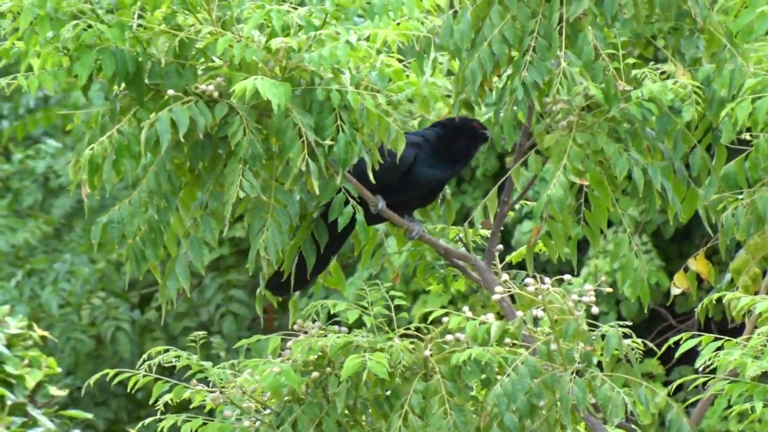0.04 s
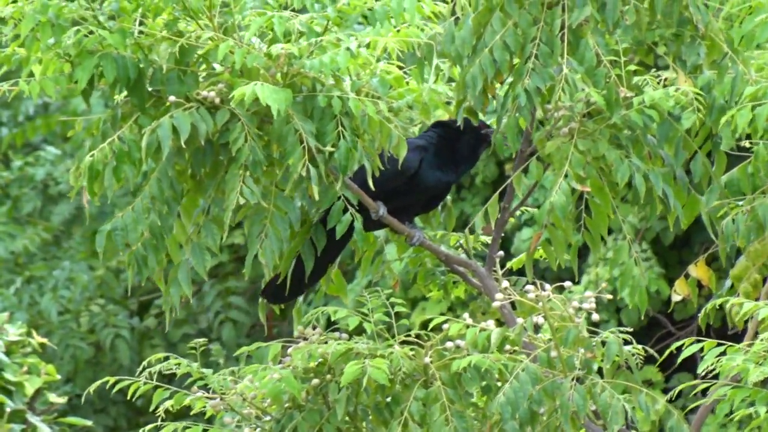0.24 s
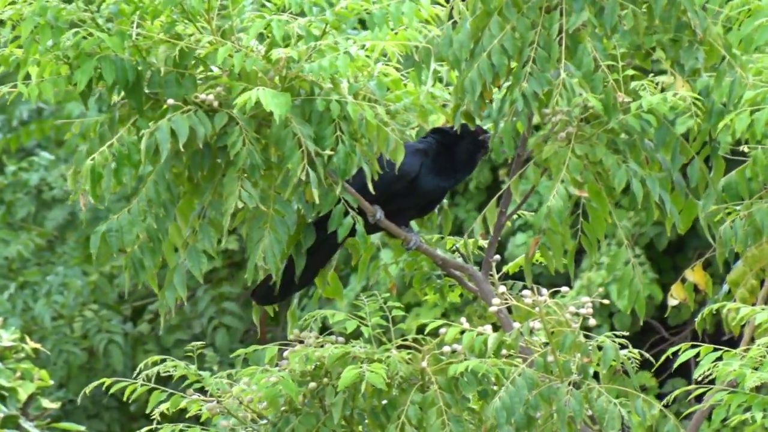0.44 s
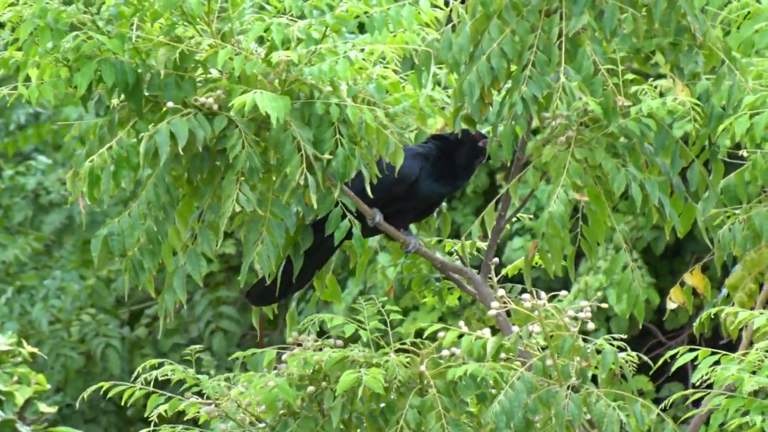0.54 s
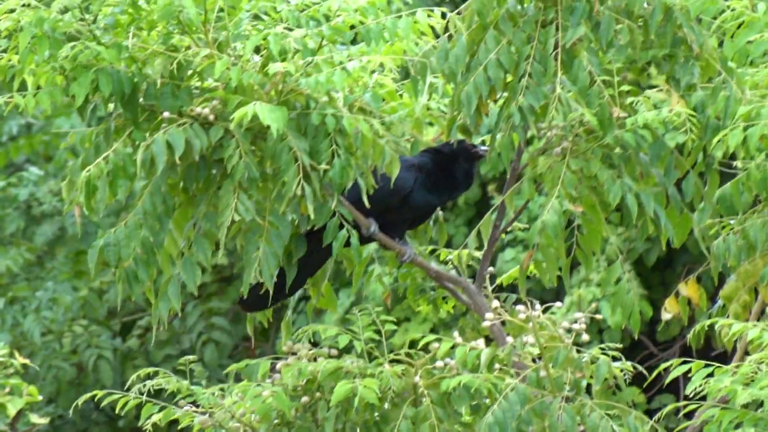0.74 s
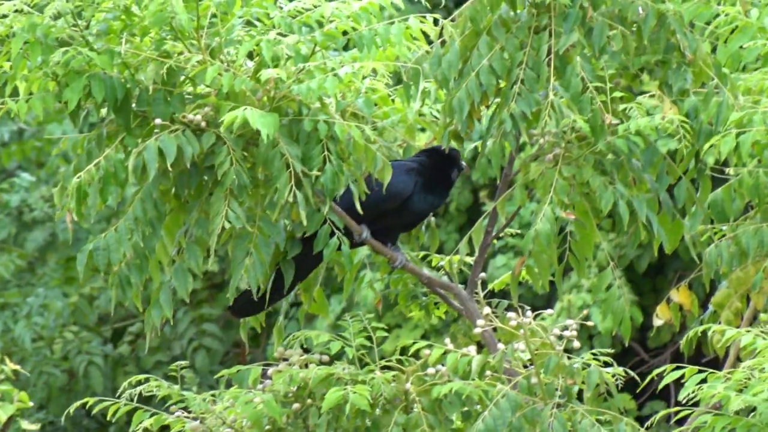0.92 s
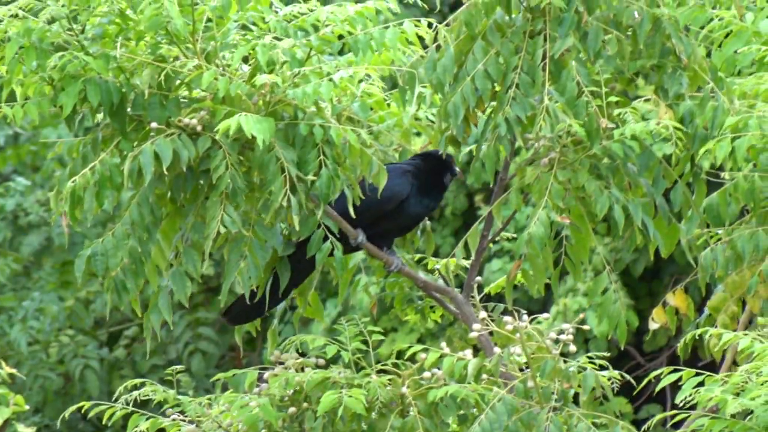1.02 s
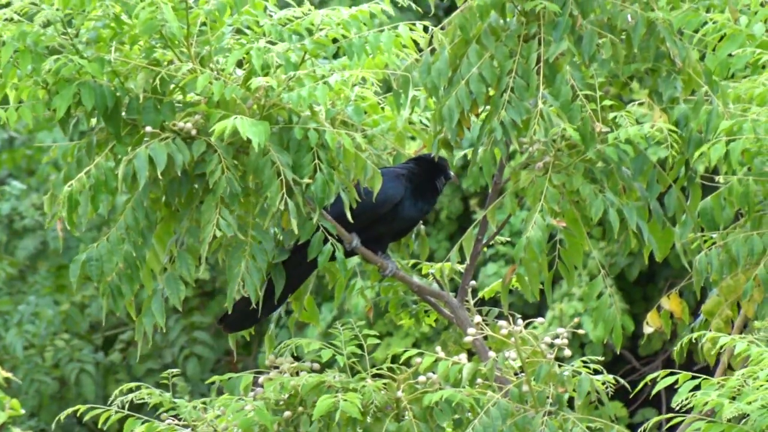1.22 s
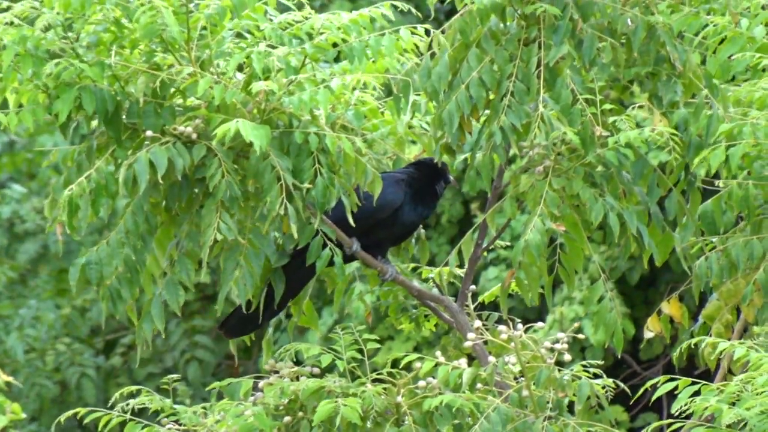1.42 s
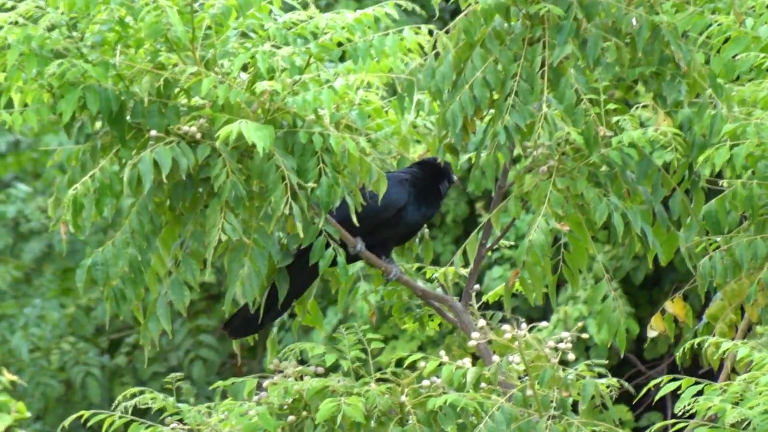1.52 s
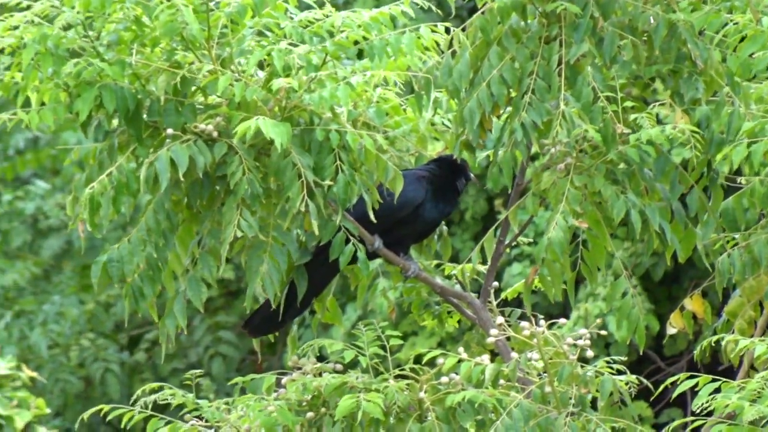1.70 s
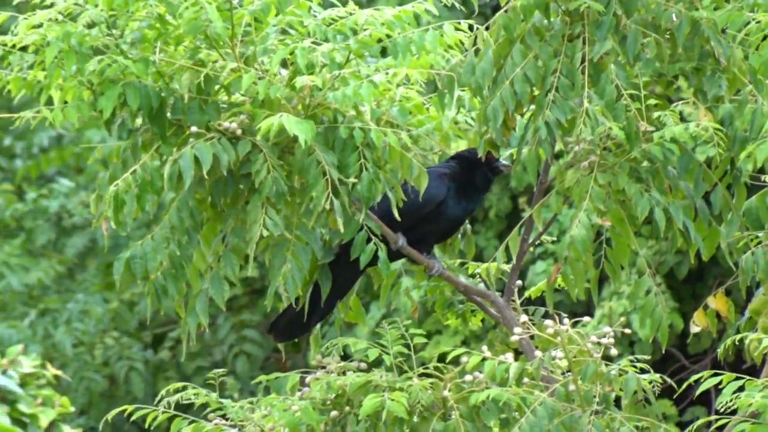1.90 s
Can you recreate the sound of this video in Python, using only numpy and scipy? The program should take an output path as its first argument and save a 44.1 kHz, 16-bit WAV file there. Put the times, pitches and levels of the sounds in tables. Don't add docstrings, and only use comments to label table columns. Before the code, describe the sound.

A large dark bird whistles one clear echoing note that rises then falls in a leafy garden

```python
import sys
import numpy as np
from scipy import signal
from scipy.fft import rfft, irfft
from scipy.io import wavfile
from scipy.ndimage import uniform_filter1d, map_coordinates

SR = 44100
rng = np.random.default_rng(int(sys.argv[2]) if len(sys.argv) > 2 else 0)


def unload_wav(signal):
    wavfile.write(
        sys.argv[1],
        SR,
        np.round(np.clip(np.atleast_2d(signal).T, -1, 1) * 32767).astype(np.int16),
    )


def volts_from_db(level):
    exponent = np.asarray(level, float) / 20
    return 10 ** exponent


N = 85995

# time in seconds, pitch in Hz, level in dB.
CALL_NOTE = [
    (0.307, 1364.0, -23.1),
    (0.354, 1358.6, -27.0),
    (0.478, 1354.2, -18.8),
    (0.544, 1399.8, -15.9),
    (0.595, 1465.7, -25.0),
    (0.645, 1546.6, -17.3),
    (0.697, 1558.3, -17.4),
    (0.743, 1496.8, -20.7),
    (0.856, 1015.6, -35),
]
# multiple of the pitch, level in dB against the main tone.
CALL_OVERTONES = [(2, -32), (3, -40), (4, -41), (5, -33), (6, -48), (7, -48), (8, -50), (9, -43), (11, -42)]
# time in seconds, pitch in Hz, level in dB.
RISING_NOTE = [(.33, 4240, -45), (.36, 4370, -42), (.4, 4610, -32), (.44, 4855, -35.5), (.48, 4975, -32.5),
               (.52, 5050, -35), (.59, 5073, -30.5), (.61, 5070, -35), (.63, 5040, -48)]
SWOOPING_NOTE = [(.195, 3250, -24), (.205, 2960, -26.5), (.222, 2493, -36), (.238, 2379, -22),
                 (.25, 2214, -32), (.265, 2212, -18), (.295, 2110, -28), (.315, 2112, -32.5),
                 (.345, 2068, -60)]
CHIP_NOTE = [(.615, 2520, -50), (.638, 2400, -38), (.65, 2340, -23), (.66, 2300, -31), (.67, 2180, -36),
             (.69, 2030, -48)]
SAGGING_NOTE = [(0, 2893, -39), (.04, 2810, -37), (.09, 2703, -32), (.135, 2617, -38), (.155, 2590, -55),
                (.2, 2610, -38), (.22, 2643, -23.5)]
# multiple of the listed pitch, level in dB against the tone at that pitch. For
RISING_PARTIALS = [(.5, -17), (1.5, -25), (2, -27), (3, -50)]
SWOOPING_OVERTONES = [(2, -28)]
# start in seconds, length in seconds, pitch in Hz, glide in Hz, level in dB.
FAR_PIPINGS = [
    (.33, .2, 2210, 350.5, -47),
    (0.414, 0.61, 3400, 147, -50.5),
    (0.66, 0.1, 3120, -52.5, -52),
    (0.675, 0.04, 1216, -18, -43),
    (1.655, 0.04, 2780, 8, -50),
    (1.775, 0.065, 3760, -0.5, -46),
    (1.87, .08, 3730, -1, -43),
    (1.8, 0.13, 4230, 17, -47),
    (1.87, .06, 2700, 240, -49),
]
# time in seconds, centre in Hz, level in dB, width in Hz.
RASP_PATH = [
    (1.03, 3100, -55, 900),
    (1.08, 3350, -37, 1100),
    (1.2, 3420, -36, 1100),
    (1.3, 3350, -33, 900),
    (1.41, 3000, -33, 800),
    (1.44, 2900, -40, 900),
    (1.47, 2800, -55, 900),
]
# time in seconds, centre in Hz, level in dB, width in Hz.
RASP_BREAK = [
    (1.405, 2500, -48, 600),
    (1.425, 2320, -37, 450),
    (1.455, 2150, -35, 400),
    (1.468, 1750, -45, 800),
    (1.49, 1600, -43, 700),
    (1.505, 1330, -43, 450),
    (1.545, 1220, -42, 350),
    (1.56, 1150, -55, 300),
]
# delay in seconds, level in dB, left over right in dB.
NEAR_ECHOES = [(0.0122, -12.9, 5.6), (0.01813, -15.6, -5.4), (0.02436, -18.6, -5.7), (0.02497, -10.5, 0.9),
               (0.03518, -10.0, -1.6), (0.04454, -13.5, 4.9), (0.04793, -4.6, -0.7), (0.05576, -19.1, 2.7),
               (0.05918, -12.7, -4.0), (0.0725, -16.3, 3.9), (0.08151, -17.0, -5.5), (0.0963, -20.2, 1.6),
               (0.11501, -17.2, -4.3), (0.12631, -18.6, -5.9)]
# delay in seconds, level in dB, left over right in dB.
FAR_ECHOES = [(.107, -16, -3), (.15, -19, -4), (.172, -15, 1), (.2, -21, 0), (.225, -24, -1),
              (.255, -24, 1.4), (.29, -25, -5), (.33, -30, -3)]
# time in seconds, level in dB.
GUST_STRENGTH = [(0.0, -73), (0.732, -58.5), (0.934, -56), (1.07, -32), (1.2, -46.5), (1.378, -39.5),
                 (1.514, -28.5), (1.58, -29), (1.688, -41), (1.824, -32.5), (1.95, -44)]
# time in seconds, peak in dB, pitch in Hz, push (1) or suction (-1).
WIND_BUFFETS = [(1.006, -27, 69, -1), (1.288, -18.5, 96, 1), (1.42, -20, 151, 1), (1.466, -22, 130, 1),
                (1.505, -21, 99, 1), (1.531, -20, 80, -1), (1.546, -19, 130, 1), (1.56, -15.5, 270, 1),
                (1.611, -19, 90, 1), (1.625, -22, 80, -1), (1.662, -12, 170, -1), (1.665, -19, 260, 1),
                (1.827, -25.5, 108, -1), (1.84, -23, 130, 1), (1.868, -20, 230, 1)]
# frequency in Hz, level in dB per Hz.
WIND_SPECTRUM = [(15, -40), (25, -21), (49, 6), (130, 2.5), (390, -9.5), (430, -39), (700, -19.5),
                 (910, -65), (1540, -120)]
AIR_SPECTRUM = [(18, -41.5), (40, -0.5), (140, -4), (532, -12.5), (2180, -18), (3400, -13), (10200, -33),
                (15500, -33)]
# frequency in Hz, likeness from 0 to 1.
AIR_LIKENESS = [(60, .995), (200, .99), (380, .96), (700, .88), (1400, .75), (3100, .42), (6800, .1),
                (15000, .15)]
# centre in Hz, width in Hz, boost in dB.
MIC_TREBLE = [
    (13000, 450, -8),
    (13850, 250, 5),
    (15100, 800, -10),
]


def whistle(rows, overtones, flutter_db, smooth_s=0.02, wobble=0.00196):
    beak_hz, beak_width_hz, beak_boost_db = 14500, 1300, 10
    hz, db, gate = in_time(rows, smooth_s)
    phase = 2 * np.pi * np.cumsum(hz * (1 + wobble * drift(30.0))) / SR
    tone = np.sin(phase) * volts_from_db(flutter_db * drift(29))
    for multiple, level_db in overtones:
        beak_db = beak_boost_db * np.exp(-((multiple * hz - beak_hz) / beak_width_hz) ** 2)
        loudness = volts_from_db(level_db + beak_db + 3.5 * drift(15))
        tone = tone + loudness * np.sin(multiple * phase)
    return np.sqrt(2) * volts_from_db(db) * gate * tone


def large_bird():
    return volts_from_db(.6) * whistle(CALL_NOTE, CALL_OVERTONES, 0, smooth_s=.0295, wobble=0)


def rasp():
    skirt_db, skirt_width, upper_db, breath_db, grain_db = -6, 2.0, -15.5, -19, -1
    hz, db, width_hz, gate = in_time(RASP_PATH)
    phase = 2 * np.pi * np.cumsum(hz) / SR
    core = blurred(phase, width_hz)
    skirt = volts_from_db(skirt_db) * blurred(1.08 * phase, skirt_width * width_hz)
    upper = volts_from_db(upper_db) * blurred(2.2 * phase, 2.6 * width_hz)
    breath_band = signal.butter(2, [5000, 13500], "band", fs=SR, output="sos")
    breath = volts_from_db(breath_db) * signal.sosfilt(breath_band, rng.standard_normal(N))
    loudness = volts_from_db(db + 3.5 + grain_db * drift(150)) * gate
    return loudness * (core + skirt + upper + breath) + rasp_break()


def rasp_break():
    hz, db, width_hz, gate = in_time(RASP_BREAK, .006)
    phase = 2 * np.pi * np.cumsum(hz) / SR
    return volts_from_db(db + 2.5) * gate * blurred(phase, width_hz)


def pipings():
    total = 0
    for start, length, hz, glide_hz, db in FAR_PIPINGS:
        swell = [(start, hz, db - 6),
                 (start + length / 3, hz + glide_hz / 3, db),
                 (start + length, hz + glide_hz, db - 5)]
        total = total + whistle(swell, [], 4.5, wobble=.008)
    return total


def garden_echoes(x):
    scatter_db, scatter_t60_s, scatter_rise_s, scatter_width, smear_s = -16.5, .9, .2, .8, .012
    t = np.arange(int(.9 * SR)) / SR
    shape = volts_from_db(-60 * t / scatter_t60_s) * np.clip(t / scatter_rise_s, 0, 1) ** 2
    mid, side = rng.standard_normal((2, len(t))) * shape
    scatter = mid + scatter_width * side * [[1], [-1]]
    late = volts_from_db(scatter_db) * scatter / np.sqrt(np.sum(mid ** 2))
    for delay, db, pan_db in FAR_ECHOES:
        burst = rng.standard_normal(len(t)) * np.exp(-((t - delay) / smear_s) ** 2)
        late = late + pan(volts_from_db(db) * burst / np.sqrt(np.sum(burst ** 2)), pan_db)
    near = 0
    for delay, db, pan_db in NEAR_ECHOES:
        near = near + pan(volts_from_db(db) * np.sinc((t - delay) * SR / 2) / 2, pan_db)
    dull = signal.sosfilt(signal.butter(2, 3500, fs=SR, output="sos"), x)
    near, late = [signal.fftconvolve(dull[None], reply, axes=1)[:, :N] for reply in (near, late)]
    leaf_sway = volts_from_db(4 * drift(35) - 2)
    return near + late * leaf_sway


def wind():
    port_lag_s, buffet_cycles, lump_db = .0011, 0.53, 3.5
    db, _ = in_time(GUST_STRENGTH)
    strength = volts_from_db(db + lump_db * drift(19))
    out = strength * banded_noise(WIND_SPECTRUM, [(30, 1.0), (250, .35)], patchy_db=1.5)
    t = np.arange(N) / SR
    for start, peak_db, hz, sign in WIND_BUFFETS:
        cycles = (t - start - port_lag_s / 2 * np.array([[1], [-1]])) * hz
        swell = np.exp(-(cycles / buffet_cycles) ** 2)
        out = out + sign * volts_from_db(peak_db) * swell * np.cos(2 * np.pi * cycles + .5)
    return out


def chorus():
    centre_hz, width_hz, level_db, patch_db = 3400, 500, -46, 2.5
    phase = 2 * np.pi * centre_hz * np.arange(N) / SR
    sides = [blurred(phase, np.full(N, width_hz)) for _ in range(2)]
    return volts_from_db(level_db + patch_db * drift(6.9)) * np.array(sides)


def town_and_leaves():
    return volts_from_db(-35) * banded_noise(AIR_SPECTRUM, AIR_LIKENESS, patchy_db=1.08)


def banded_noise(spectrum, likeness, patchy_db):
    out, edges = 0, 25 * 2 ** np.arange(0, 9.6, .5)
    white = rng.standard_normal((2, 2, N + 4000))
    for k, (low, high) in enumerate(zip(edges, edges[1:])):
        hz = np.sqrt(low * high)
        if hz > spectrum[-1][0] * 1.2:
            break
        band = signal.butter(2, [low, high], "band", fs=SR, output="sos")
        mid, side = signal.sosfilt(band, white[k % 2])[:, -N:]
        alike = np.clip(at_hz(likeness, hz), 0, 1)
        gain = volts_from_db(at_hz(spectrum, hz) + patchy_db * drift(16.0))
        out = out + gain * (np.sqrt(1 + alike) * mid + np.sqrt(1 - alike) * side * [[1], [-1]])
    return rms_one(out)


def blurred(phase, width_hz):
    steps = np.cumsum(width_hz) / SR
    a, b = [map_coordinates(row, [steps % len(row)], order=1)
            for row in rng.standard_normal((2, SR // 2))]
    return a * np.sin(phase) + b * np.cos(phase)


def pan(x, db, lag=0):
    port_hz = 7200
    low = signal.sosfiltfilt(signal.butter(3, port_hz, fs=SR, output="sos"), x) if lag else 0
    left = x - low + np.roll(low, lag)
    return np.array([left * volts_from_db(db / 2), x * volts_from_db(-db / 2)])


def in_time(rows, smooth_s=0.022):
    s, *columns = np.transpose(rows)
    t = np.arange(N) / SR
    gate = np.clip(np.minimum(t - s[0], s[-1] + .01 - t) / .01, 0, 1)
    size = int(smooth_s * SR) + 1
    return [uniform_filter1d(np.interp(t, s, c), size, mode="nearest") for c in columns] + [gate]


def drift(rate_hz):
    r = np.exp(-2 * np.pi * rate_hz / SR)
    wander = signal.lfilter([1], [1, -2 * r, r * r], rng.standard_normal(N + 20000))
    return rms_one(wander[20000:])


def at_hz(points, hz):
    points = np.array(points)
    return np.interp(np.log(hz), np.log(points[:, 0]), points[:, 1])


def rms_one(x):
    return x / np.sqrt(np.mean(np.abs(x) ** 2) + 1e-20)


def scene():
    call = large_bird()
    riser = whistle(RISING_NOTE, RISING_PARTIALS, 1.5, wobble=0.0008)
    swoop = whistle(SWOOPING_NOTE, SWOOPING_OVERTONES, -1.5, smooth_s=0.007)
    chip = whistle(CHIP_NOTE, [], 0.78, smooth_s=0.0047)
    far = whistle(SAGGING_NOTE, [], 3.5, wobble=0.014) + pipings()
    harsh = rasp()

    to_walls = call + volts_from_db(-10) * riser + volts_from_db(-7) * swoop + volts_from_db(-11.5) * chip
    to_walls = to_walls + volts_from_db(-6.5) * far + volts_from_db(-3.5) * harsh

    direct = pan(call, 0, lag=-2) + pan(riser, 3.1, lag=-1)
    direct = direct + pan(swoop + chip, .3, lag=-2)
    direct = direct + pan(far, 3.3) + pan(harsh, 1.4, lag=-2)
    return direct + garden_echoes(to_walls) + chorus() + town_and_leaves() + wind()


def roll_off(x):
    return signal.sosfilt(signal.butter(12, 15640, fs=SR, output="sos"), x)


def record(dry):
    right_top_hz, right_top_db, mic_cut_hz = 11500, 4, 13400
    hz = np.fft.rfftfreq(N, 1 / SR)
    colour_db = 0
    for centre_hz, width_hz, db in MIC_TREBLE:
        colour_db = colour_db + db * np.exp(-((hz - centre_hz) / width_hz) ** 2)
    top_share = 1 / (1 + (right_top_hz / (hz + 1)) ** 8)
    colour_db = colour_db + right_top_db / 2 * np.array([[-1], [1]]) * top_share
    heard = irfft(rfft(dry) * volts_from_db(colour_db), N)
    mix = signal.sosfilt(signal.butter(4, mic_cut_hz, fs=SR, output="sos"), heard)
    return roll_off(mix)


dry = scene()
out = record(dry)
unload_wav(out)
```